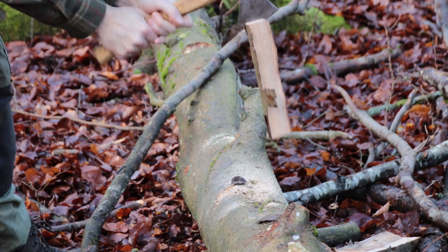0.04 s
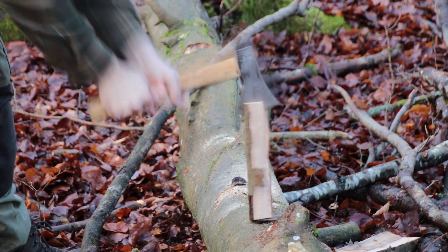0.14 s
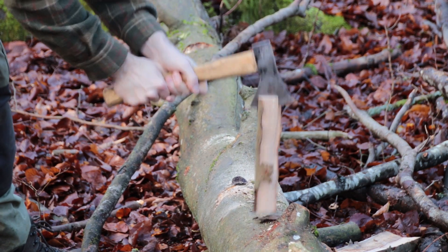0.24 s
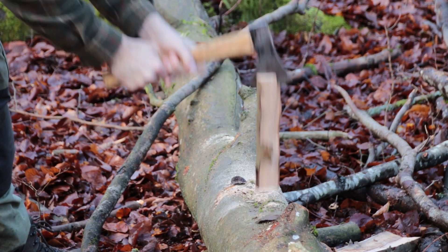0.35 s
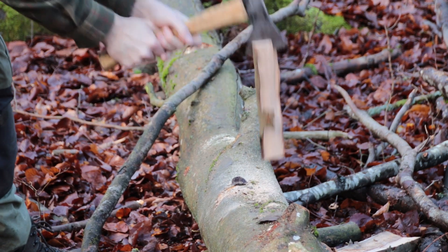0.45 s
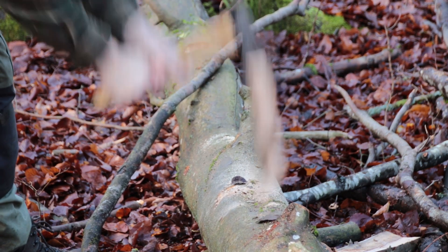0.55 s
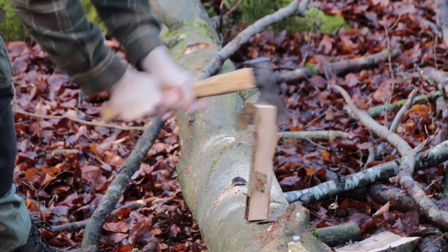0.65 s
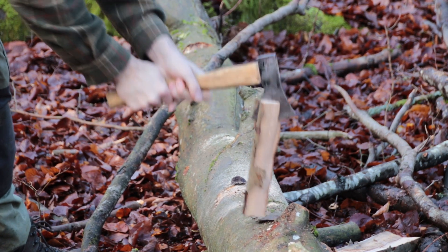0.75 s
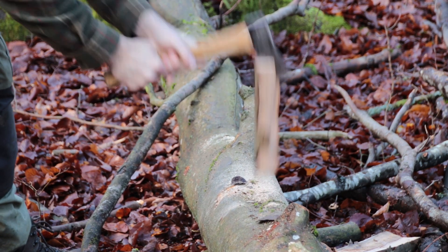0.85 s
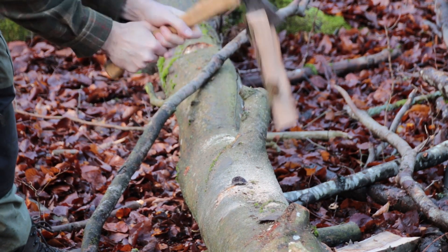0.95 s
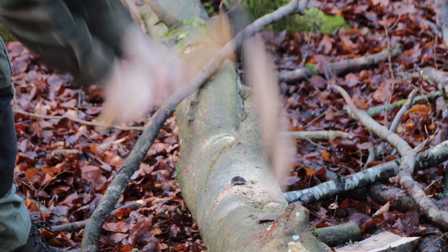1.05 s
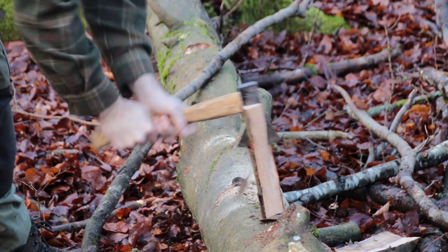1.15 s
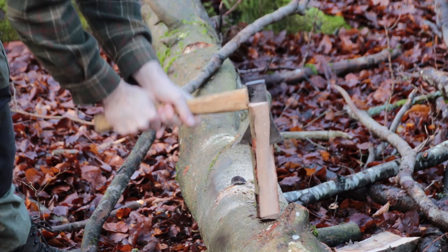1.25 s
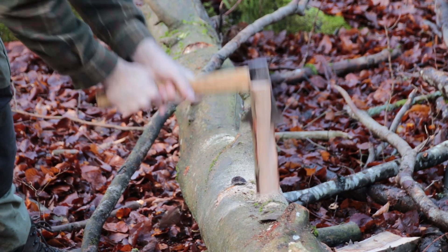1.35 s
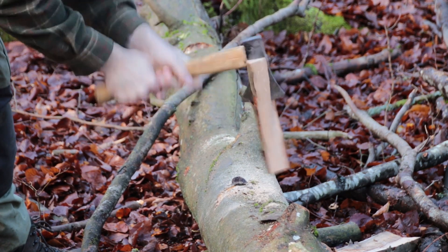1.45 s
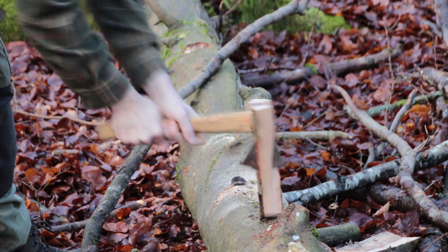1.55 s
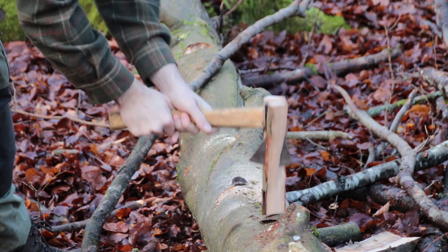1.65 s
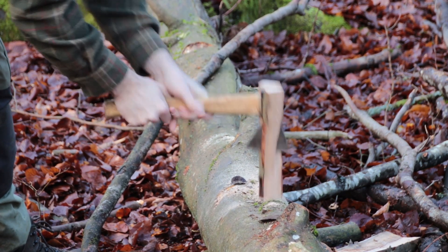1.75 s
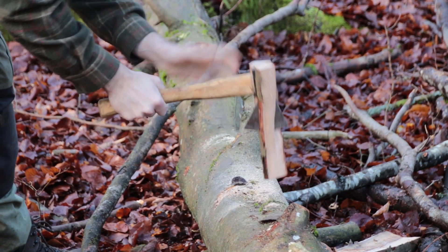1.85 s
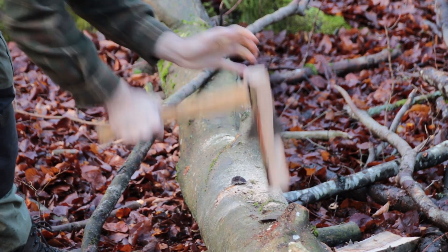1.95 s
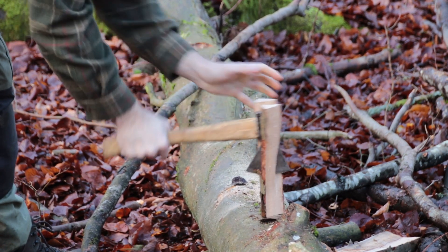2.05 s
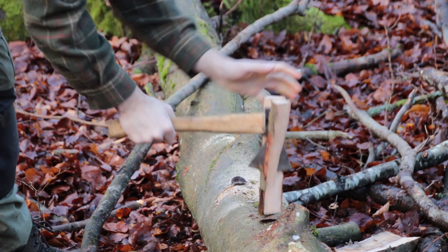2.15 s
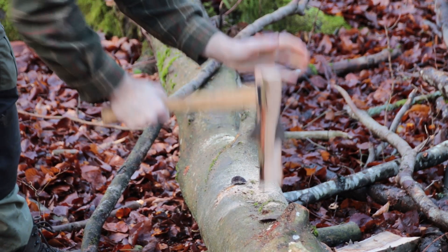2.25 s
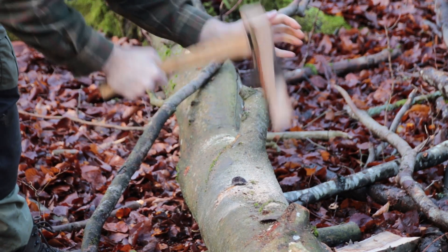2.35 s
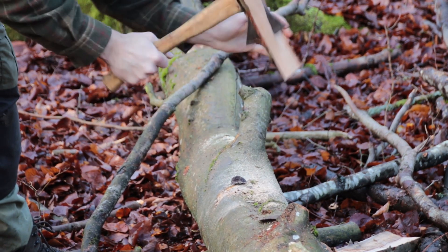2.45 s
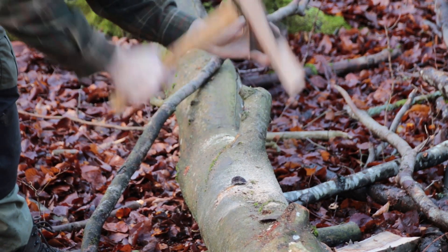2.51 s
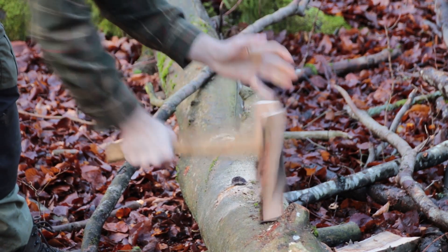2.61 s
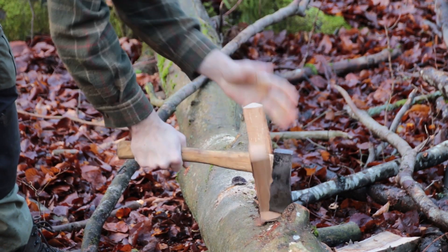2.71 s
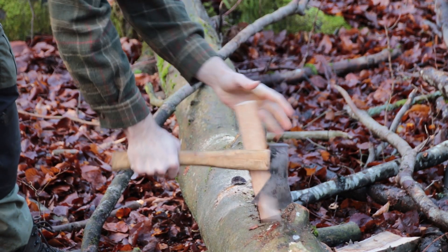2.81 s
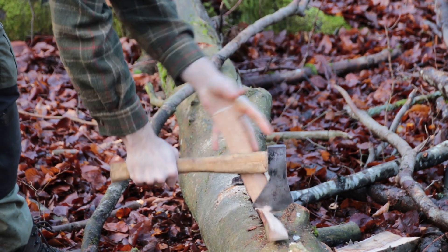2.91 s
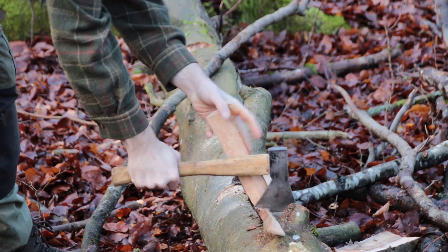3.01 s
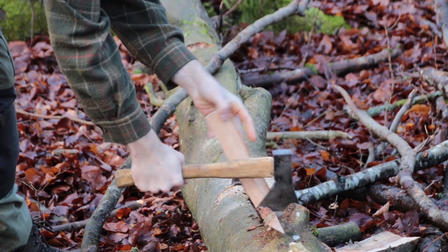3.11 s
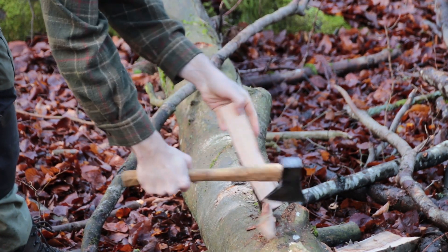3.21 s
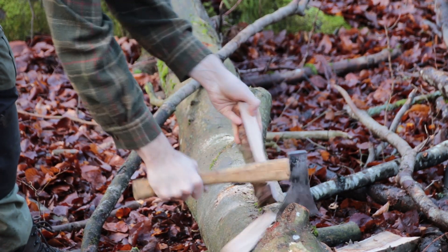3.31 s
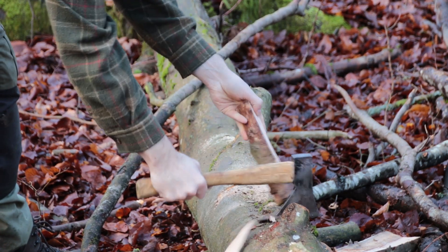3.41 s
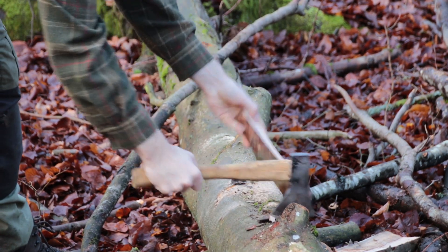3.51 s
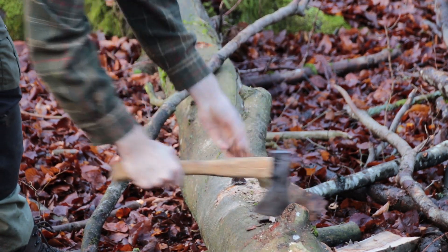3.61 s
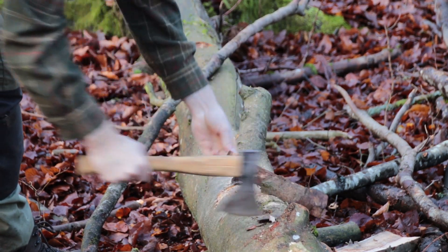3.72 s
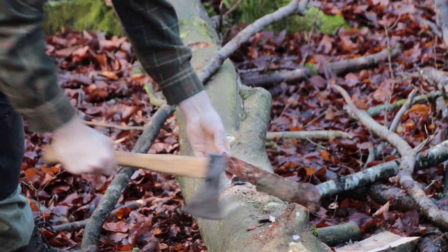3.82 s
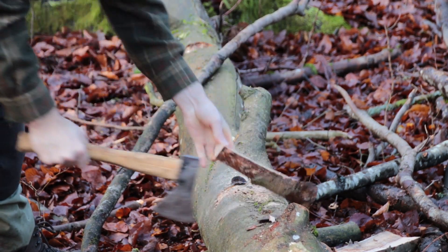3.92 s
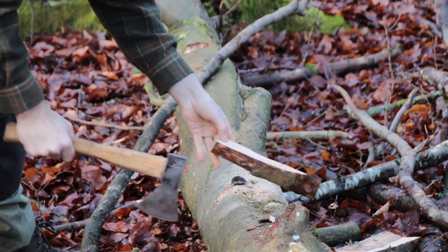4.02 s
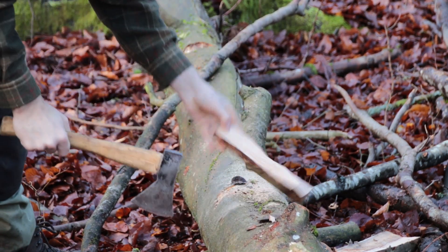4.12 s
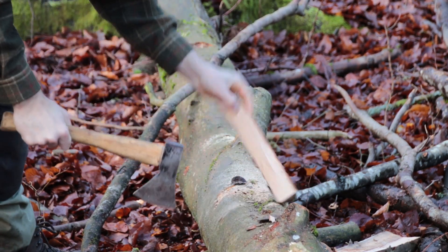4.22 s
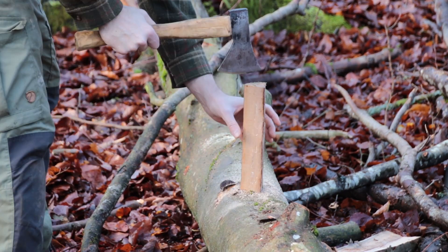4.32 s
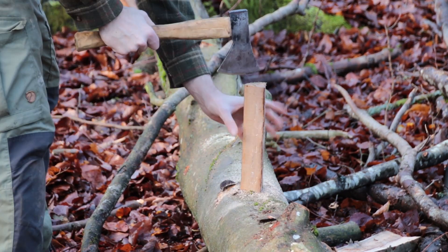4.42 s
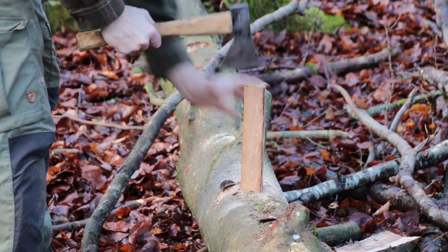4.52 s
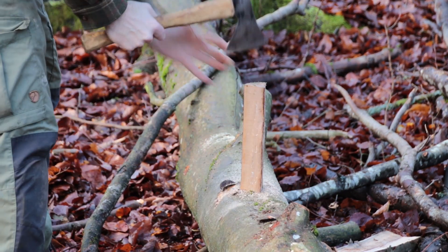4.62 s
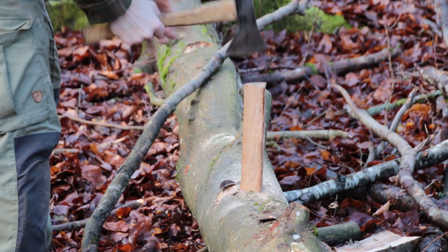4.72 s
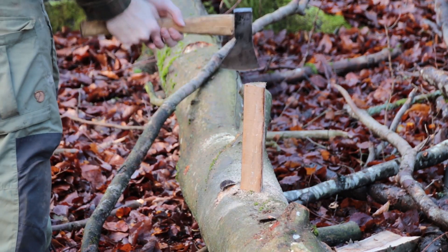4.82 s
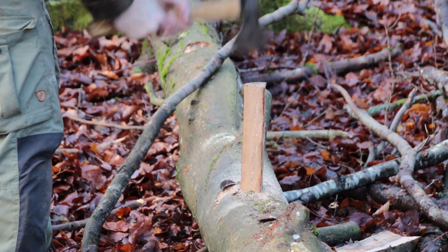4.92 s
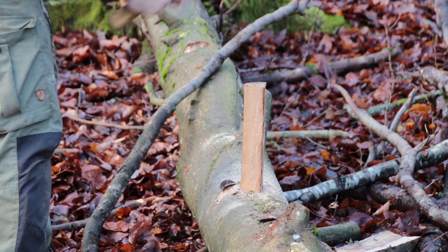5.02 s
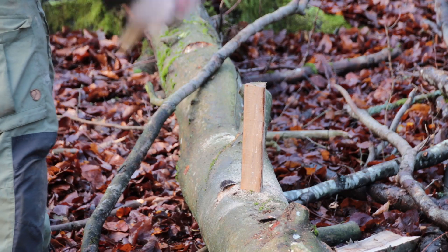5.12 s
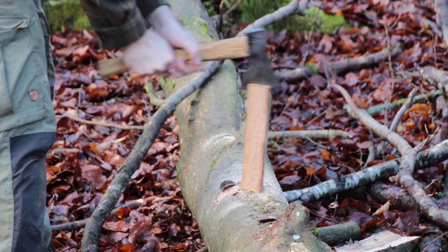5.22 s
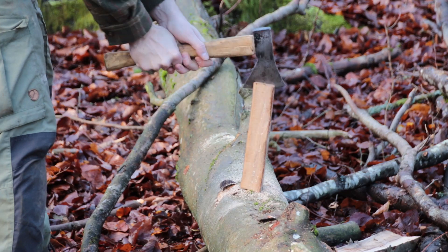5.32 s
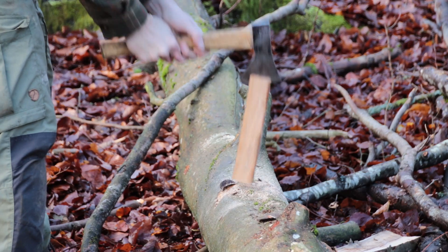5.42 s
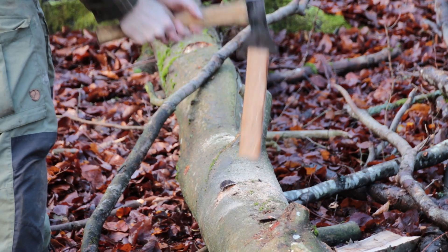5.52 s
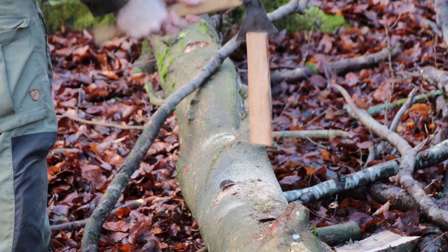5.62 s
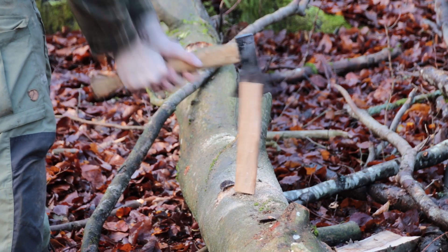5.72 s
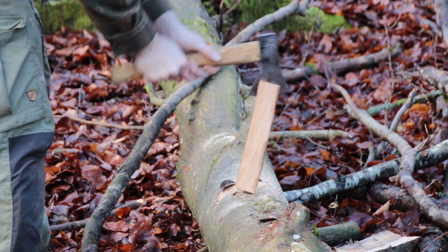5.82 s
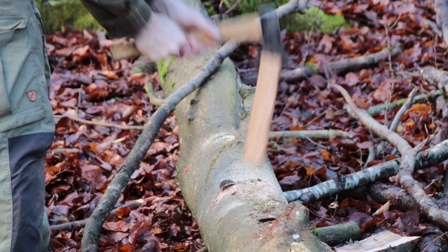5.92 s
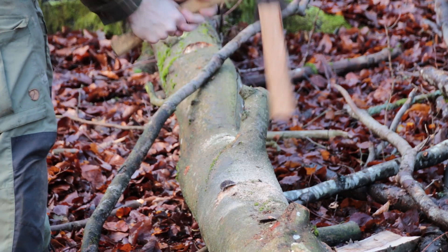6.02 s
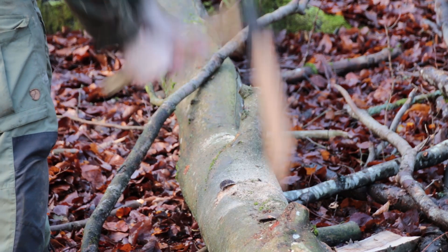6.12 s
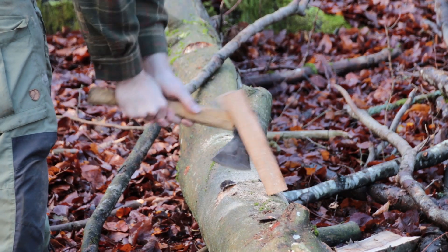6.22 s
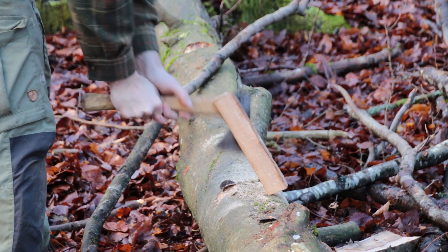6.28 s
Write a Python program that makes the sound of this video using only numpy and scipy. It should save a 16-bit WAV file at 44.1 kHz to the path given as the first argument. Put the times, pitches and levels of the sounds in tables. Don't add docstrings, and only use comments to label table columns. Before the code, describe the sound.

Close, sharp wood-splitting blows on a hollow-ringing log, fibres crackling and trees answering, with small hand and cloth noises in a quiet winter wood.

```python
import sys
import numpy as np
from scipy import signal
from scipy.fft import rfft, irfft, next_fast_len
from scipy.io import wavfile
from scipy.ndimage import uniform_filter1d, map_coordinates

SR = 44100
rng = np.random.default_rng(int(sys.argv[2]) if len(sys.argv) > 2 else 0)


def bounce(signal):
    frames = np.transpose(np.atleast_2d(signal))
    limited = np.clip(frames, -1, 1)
    pcm = np.round(limited * 32767).astype(np.int16)
    wavfile.write(sys.argv[1], SR, pcm)


def gain_from_db(level_db):
    decades = np.asarray(level_db, float) / 20
    return 10 ** decades


N = 280035

# crest_s, thud_db, trunk_ring_db, spot_along_trunk_0_1, ground_boom_db
BLOWS = [
    (0.2528, -2, -2.5, 0.4, -41.5),
    (.686, -3, -2, .456, -44),
    (1.184, 3, 3, 0.4, -57),
    (1.6284, -3.5, -4.5, 0.1, -63),
    (2.1016, -8, -9, 0.3, -51),
    (2.723, 1, 0, 0.7, -52),
    (2.9731, -30.5, -44, 0.7, -75.5),
    (5.287, 2, 2.5, .328, -38.5),
    (5.8068, -8, -9, 0.1, -52),
    (6.2546, 0, -0.5, .332, -48),
]
# tone_hz, width_hz, lift_db
BILLET_MODES = [
    [(2736, 400, 6), (4250, 540, 7), (7900, 760, 3.5)],
    [(2780, 510, 8.5), (4113, 400, 11), (7570, 660, -2.5)],
    [(2650, 190, 7), (3900, 170, 12.5), (8100, 1300, 1.5)],
    [(2900, 300, 13.5), (5000, 1600, 6.5), (8200, 1300, 7.5)],
    [(1700, 450, 9), (2606, 410, 2.5), (4500, 1100, 7.5)],
    [(1600, 250, 3), (3970, 340, 6), (4506, 870, 5.5)],
    [(1000, 190, 9.5), (1850, 760, 20), (3100, 190, 7), (4500, 600, 18)],
    [(2950, 610, 6.5), (3900, 330, 8), (7500, 590, 0.5)],
    [(3450, 1200, 12.5), (5030, 560, 9.5), (6750, 1200, 12)],
    [(2830, 330, 6.5), (3400, 300, 6), (8330, 980, 4)],
]
# tone_hz, width_hz
TRUNK_MODES = [(190, 93), (267, 23.8), (351, 14), (423, 36), (456, 51), (592, 14), (700, 22), (830, 33),
               (965, 43), (1135, 33), (1330, 210)]


def unit(x):
    return x / np.sqrt(np.mean(x ** 2) + 1e-20)


def along(points, hz):
    f, v = np.transpose(points)
    return np.interp(np.log(hz + 1), np.log(f + 1), v)


def coloured(x, spectrum, lifts=()):
    m = next_fast_len(x.shape[-1] + 2048)
    hz = np.fft.rfftfreq(m, 1 / SR)
    db = along(spectrum, hz)
    for tone_hz, width_hz, lift_db in lifts:
        db = db + lift_db / (1 + (2 * (hz - tone_hz) / width_hz) ** 2)
    cepstrum = irfft(db * np.log(10) / 20, m)
    cepstrum[1:m // 2] *= 2
    cepstrum[m // 2 + 1:] = 0
    response = np.exp(rfft(cepstrum))
    return irfft(rfft(x, m) * response, m)[..., :x.shape[-1]]


def add(track, s, sound):
    part = track[round(s * SR):][:len(sound)]
    part += sound[:len(part)]


def dying(t, t60, attack):
    return gain_from_db(-60 * t / t60) * (1 - np.exp(-t / attack))


def sine(hz, t):
    return np.sin(2 * np.pi * hz * t)


def thuds():
    # crest_s, peak_db
    rebounds = [(0.2555, -11.5), (.257, -9.5), (0.2664, -16), (0.2782, -14), (0.7, -10), (.2893, -24),
                (5.3335, -24), (6.3008, -24), (1.6665, -25), (1.683, -27), (5.206, -37), (0.7122, -12),
                (1.2064, -11.5), (1.211, -15), (1.188, -2.5), (1.631, -21.5), (1.6342, -9), (2.1052, -11.5),
                (2.124, -19), (2.734, -8), (5.302, -10.5), (5.3133, -16), (5.2892, -9.5), (5.8106, -6),
                (5.8136, -15), (5.8241, -10.5), (6.257, -6), (6.2693, -8), (6.274, -15)]
    out, u = np.zeros(N), np.arange(-260, 260) / SR
    swing_hz = np.where(u < 0, 690, 430)
    spread_s = np.where(u < 0, 0.0009, 0.0013)
    chirp = 45000 * np.minimum(u, 0) ** 2
    swing = np.cos(2 * np.pi * (swing_hz * u - chirp)) * np.exp(-(u / spread_s) ** 2)
    for s, db in [blow[:2] for blow in BLOWS] + rebounds:
        add(out, s + u[0], gain_from_db(db) * swing)
    return signal.sosfilt(signal.butter(2, 120, "high", fs=SR, output="sos"), out)


def fractures():
    # start_s, peak_db, billet_ring_hz, splinter_brightness_db
    cracks = [(0.255, -8.5, 4360, -9), (0.258, 1, 2780, -9), (0.2617, -9.5, 4250, -2),
              (0.688, -8, 4370, -7), (0.6901, 1, 2810, -15), (0.6906, -7.5, 4200, -3.5),
              (.695, -11.5, 3900, -7), (1.1843, -7.5, 3995, -9), (1.2017, -6, 4120, -12),
              (1.1888, 11, 2400, -11.5), (1.1912, -5, 2725, -9), (1.1955, 0.5, 2785, -8.5),
              (1.1984, 0.5, 2570, -8), (1.2041, -12, 3286, -10.5), (1.6318, -6.5, 2872, -15.5),
              (1.6369, -12, 2812, -6.5), (1.643, -4.5, 2922, -7.5), (1.6464, -1.5, 2881, -9.5),
              (1.6492, -1.5, 2900, -6), (2.1039, -15, 5000, -10), (2.1053, -14.5, 1957, -11.5),
              (2.1139, -23, 3015, -12.5), (2.725, -12, 3900, -8), (2.7264, -5, 4500, -6),
              (2.7263, -2.5, 1600, -9.5), (2.73, -4, 1590, -3.5), (2.7366, -10.5, 3610, -4.5),
              (2.7412, -8, 3960, 0), (2.7465, -12, 3650, -4.5), (2.9772, -22, 1850, -30.5),
              (2.9805, -24.5, 1820, -29.5), (5.29, 0, 3100, -5.5), (5.2922, -6.5, 4015, -7.5),
              (5.293, 8, 2859, -7.5), (5.294, 3.5, 2945, -9.5), (5.301, -17, 3343, -9.5),
              (5.8087, -17, 2970, -7.5), (5.8142, 1.5, 2830, -13), (5.8154, -3.5, 3810, -13.5),
              (5.8155, -8.5, 5000, -16), (5.826, -17.5, 3100, -13.5), (5.8203, -16, 3180, -6),
              (6.2574, 0.5, 1884, -12), (6.2592, 2.5, 2728, -12), (6.2616, -4, 3560, -8.5),
              (6.2719, -9, 3450, -15.5), (6.278, -9, 3370, -18), (6.283, -17, 3354, -27)]
    loudest = []
    for s, *_ in BLOWS:
        of_blow = [c for c in cracks if 0 < c[0] - s < 0.05]
        loudest.append(max(of_blow, key=lambda c: c[1]))
    return cracks, loudest


def cracking():
    # tone_hz, density_db
    splinter_spectrum = [(500, -24.5), (950, -3), (1450, -4), (2000, -7), (4000, -4), (6000, -17.5),
                         (8000, -11.5), (10000, -24), (13000, -16), (15800, -26.5)]
    out, t = np.zeros(N), np.arange(SR // 12) / SR
    dull, bright = np.zeros((2, N))
    for s, db, hz, bright_db in fractures()[0]:
        body = gain_from_db(db) * dying(t, 0.012, 0.00019)
        spit = gain_from_db(db) * dying(t, 0.0081, 0.00019)
        sizzle = gain_from_db(db - 19) * dying(t, 0.045, 0.0013)
        spit = spit + sizzle
        drift = np.cumsum(rng.standard_normal(len(t))) * 0.06
        add(out, s, 0.78 * body * np.sin(2 * np.pi * hz * t + drift))
        add(dull, s, gain_from_db(4.5) * spit * rng.standard_normal(len(t)))
        add(bright, s, gain_from_db(bright_db + 17.5) * spit * rng.standard_normal(len(t)))
    for (s, *_), modes in zip(BLOWS, BILLET_MODES):
        start_s = s - 0.002
        span = slice(round(start_s * SR), round(start_s * SR) + SR // 8)
        mixed = coloured(dull[span], [(3500, 2.5), (6000, -35.0)])
        mixed = mixed + coloured(bright[span], [(3000, -31.5), (5000, 1.0)])
        add(out, start_s, coloured(mixed, splinter_spectrum, modes))
    return out


def billet_thunk():
    # start_s, peak_db, tone_hz, t60_s
    billet_rings = [(.2545, -14.5, 420, .09), (0.2542, -22.5, 958, .05), (.688, -12, 416, .1),
                    (0.69, -21.5, 962, .05), (.689, -13, 1250, 0.039), (0.687, -13.5, 1600, 0.024),
                    (.254, -13.5, 201.1, 0.055), (0.687, -14, 200, .06), (2.104, -22, 205, 0.065),
                    (2.7242, -11, 247.3, .07), (6.257, -14.5, 200.2, .06), (1.186, -21, 761.6, .06),
                    (2.725, -13, 1090, 0.063), (.255, -18.5, 1400, 0.022), (1.634, -10, 1150, 0.029),
                    (1.63, -21, 711, .09), (2.103, -19, 1000, 0.029), (2.103, -35, 572, 0.094),
                    (2.725, -12.5, 817, 0.057), (2.9762, -21, 1740, .04), (5.289, -10, 457, 0.089),
                    (5.289, -13.5, 597, .06), (5.8101, -17.5, 272, 0.14), (5.81, -14.5, 780, .06),
                    (6.256, -12.5, 453, .08), (6.256, -18, 548, 0.046),
                    (6.2775, 2, 3350, .016), (6.282, -10, 3450, .025), (6.2575, -6, 1600, .015),
             (6.2645, -12, 1800, .015), (5.8165, -8, 5050, .022), (5.8095, -16, 5200, .012),
             (5.833, -22, 5100, .015), (5.864, -26, 3000, .02), (5.865, -28, 5000, .012),
             (1.661, -22, 5150, .015), (1.633, -14, 1900, .012), (1.633, -17, 4100, .012),
             (5.8102, -13, 400, .05), (2.9765, -23, 2120, .03), (2.7315, -12, 3550, .02),
             (2.7265, -12, 2650, .012), (5.816, -18, 950, .03), (1.6325, -9, 600, .04),
             (1.654, -22, 2950, .04), (3.44, -40, 450, .08), (2.982, -35, 1760, .12),
             (2.977, -25, 1020, .05), (3.055, -41, 1750, .025), (5.2945, -2, 2750, .014),
             (5.304, -20, 2800, .03), (5.343, -27, 3000, .03), (1.188, -8, 1750, .015),
             (2.1045, -16, 1900, .012), (.6895, -6, 880, .02), (5.204, -36, 290, .09),
             (5.204, -42, 520, .05)]
    out, t = np.zeros(N), np.arange(SR // 2) / SR
    for s, db, hz, t60_s in billet_rings:
        add(out, s, gain_from_db(db) * dying(t, t60_s, 0.001) * sine(hz, t))
    return out


def trunk_ring():
    woken_db = [-13.5, 0, -6.5, -14, -6, -4.5, 0, 0.5, 1.5, -6.5, -11.5]
    out, t = np.zeros(N), np.arange(SR // 2) / SR
    hz, width_hz = np.transpose(TRUNK_MODES)[:, :, None]
    half_waves = 7 + np.arange(len(hz))[:, None]
    decay = gain_from_db(np.array(woken_db)[:, None] - 34.3 * width_hz * t)
    builds = 1 - np.exp(-(t / 0.002) ** 2)
    for s, _, ring_db, spot, _ in BLOWS:
        wander = np.cumsum(rng.standard_normal((len(hz), len(t))), 1) * 0.03
        shape = 0.15 + np.abs(np.sin(np.pi * half_waves * spot))
        ring = shape * decay * np.cos(2 * np.pi * hz * t + wander)
        add(out, s, gain_from_db(ring_db - 8.5) * ring.sum(0) * builds)
    return out


def wood_set_down():
    # start_s, peak_db, t60_s, hardness_hz
    knocks = [
        (1.52, -37.5, 0.051, 1532),
        (3.443, -28.5, 0.024, 1480),
        (3.458, -37, 0.07, 1300),
        (4.265, -32.5, 0.069, 1570),
        (5.202, -49, 0.089, 700),
        (2.9747, -31, .1, 1900),
    ]
    out, t = np.zeros(N), np.arange(SR // 2) / SR
    hz = np.transpose(TRUNK_MODES)[0][:, None]
    for s, db, t60_s, hard_hz in knocks:
        tilt_db = 6.0 * np.log2(hz / 500) * (hard_hz / 1500 - 1.5)
        level = gain_from_db(4.8 * rng.standard_normal(hz.shape) + tilt_db)
        detuned_hz = hz * (1 + 0.06 * rng.standard_normal(hz.shape))
        ring = level * np.sin(2 * np.pi * detuned_hz * t + rng.uniform(0, 2.4, hz.shape))
        add(out, s, gain_from_db(db - 11.5) * ring.sum(0) * dying(t, t60_s, 0.0011))
        bark = [(150, -12), (400, 0), (hard_hz, -4), (4 * hard_hz, -22)]
        puff = unit(coloured(rng.standard_normal(len(t)), bark))
        add(out, s, gain_from_db(db - 11.5) * puff * dying(t, t60_s, 0.00089))
    return out


def ground():
    out, t = np.zeros(N), np.arange(SR // 2) / SR
    for s, *_, boom_db in BLOWS:
        add(out, s + 0.0082, gain_from_db(boom_db) * sine(48, t) * dying(t, 0.52, 0.027))
    return out


def ticks_and_chips():
    # start_s, peak_db, tone_hz
    ticks = [(1.2508, -33, 12430), (1.2996, -38.5, 10870), (1.3032, -34.5, 8330), (1.524, -39, 7830),
             (1.559, -41, 7870), (3.3841, -37, 5200), (3.4422, -39.5, 5910), (3.446, -39, 7890),
             (3.4997, -40, 4210), (1.4157, -33, 3790), (1.4473, -31.5, 3020), (1.4686, -31, 2865),
             (1.4944, -36, 4500), (1.5021, -35.5, 3600), (1.604, -36.5, 2950), (1.8373, -42.5, 2950),
             (1.931, -40.5, 2470), (1.9419, -35.5, 8200), (1.9634, -30.5, 1460), (1.972, -41.5, 7660),
             (2.9152, -43, 7770), (3.0971, -38.5, 4600), (3.3813, -33.5, 3665), (3.3905, -31, 3453),
             (3.412, -31.5, 1293), (3.478, -46.5, 1700), (3.4637, -30.5, 1850), (3.497, -40.5, 1700),
             (3.6152, -32, 3440), (3.6542, -39, 8040), (3.69, -34.5, 3900), (3.864, -41, 7750),
             (4.0303, -39, 3390), (4.0813, -38.5, 4840), (4.1486, -32, 5390), (4.2668, -34, 2280),
             (4.6129, -39, 2950), (4.893, -45, 4720)]
    # start_s, peak_db, tone_hz, t60_s
    chips = [(1.6604, -16, 2950, .016), (1.7014, -33, 2900, .03), (1.7053, -35, 8190, .02),
             (2.7507, -24, 7500, .034), (2.9762, -29, 4700, .022), (2.9762, -23, 1000, .04),
             (3.006, -29, 1950, .015), (3.01, -29, 1800, .015), (2.9871, -31, 2200, .018),
             (3.0027, -34, 1850, .015), (3.018, -33, 1792, .02), (5.8785, -34, 3000, .025),
             (2.9765, -24, 3150, .025), (2.995, -31, 1880, .015), (6.294, -19, 3400, .025),
             (2.1095, -26, 3800, .02), (5.832, -25, 6970, .025), (5.8551, -28, 4990, .015),
             (5.8647, -26, 6730, .02)]
    out, t = np.zeros(N), np.arange(SR // 4) / SR
    contacts = [(*tick, 0.011, 0.56) for tick in ticks]
    contacts += [(*chip, 0.45) for chip in chips]
    for s, db, hz, t60_s, noisy in contacts:
        around = [(hz / 3, -20), (hz, 0), (hz * 1.5, -9), (hz * 5, -25)]
        noise = unit(coloured(rng.standard_normal(len(t)), around))
        mixed = (1 - noisy) * sine(hz, t) + noisy * noise
        add(out, s, gain_from_db(db) * dying(t, t60_s, 0.0003) * mixed)
    return out


def steel():
    # start_s, peak_db, tone_hz, t60_s
    touches = [(1.2043, -41, 7200, 0.13), (1.206, -22, 2760, .05), (1.651, -39, 2900, .14),
               (1.654, -36, 3030, .13), (3.389, -44.5, 7340, 0.097), (3.39, -26, 2430, 0.012),
               (3.4098, -34, 2200, 0.027), (3.4125, -37, 2220, 0.018), (3.41, -41.5, 4250, 0.033),
               (3.449, -54, 7300, 0.22), (3.467, -49.5, 3100, 0.14), (4.27, -50, 1800, .1),
               (3.3905, -31, 3600, 0.013)]
    out, t = np.zeros(N), np.arange(SR // 4) / SR
    for s, db, hz, t60_s in touches:
        add(out, s, gain_from_db(db) * dying(t, t60_s, 0.001) * sine(hz, t))
    return out


def rustle():
    # crest_s, rise_s, fall_s, crest_db, brightness_db
    strokes = [(1.239, .04, 0.16, -36, -13), (3.03, .04, .1, -48, -12), (6.336, .05, .0065, -38, -3),
               (2.775, .04, .06, -36, -20), (1.69, 0.052, .12, -43.5, -7.5), (1.46, 0.27, 0.41, -46.5, -13),
               (1.937, 0.012, 0.054, -46.5, -7), (2.925, 0.045, 0.067, -48, -10),
               (3.11, 0.1, 0.08, -52, -1), (3.386, 0.023, 0.037, -43.5, -4.5),
               (3.462, 0.017, .06, -52, -12.5), (3.628, 0.016, 0.033, -33, -5.5),
               (3.68, 0.037, 0.26, -55, 1.5), (4.03, .1, 0.13, -58, 2), (4.143, .035, 0.043, -43.5, 0.1),
               (4.548, 0.036, 0.079, -54.5, 5), (5.185, 0.043, 0.069, -52, -1.2),
               (5.334, .04, 0.063, -35.5, 2.5), (5.866, 0.033, .04, -45.5, 9.5)]
    # tone_hz, density_db
    cloth_spectrum = [(150, -28.5), (350, 1.5), (1000, 1), (2200, 0.5), (4500, -5), (7000, -15),
                      (11000, -21), (15000, -26)]
    out = np.zeros(N)
    clumps = gain_from_db(3 * unit(uniform_filter1d(rng.standard_normal(N), 130)))
    grains = clumps * rng.standard_normal((2, N)) * gain_from_db(1.6 * rng.exponential(size=(2, N)))
    low = coloured(grains[0], cloth_spectrum + [(16000, -55)])
    high = coloured(grains[1], [(1500, -40.0), (3500, 1.5), (7500, 4), (13000, -10)])
    low, high = low / low.std(), high / high.std()
    for s, rise_s, fall_s, db, bright_db in strokes:
        now = np.arange(round((s - rise_s) * SR), round((s + 2 * fall_s) * SR))
        away = np.maximum((s - now / SR) / rise_s, (now / SR - s) / fall_s)
        level = gain_from_db(db - 4.0 - 19 * away)
        out[now] += level * (low[now] + gain_from_db(bright_db) * high[now])
    return out


def scatter(decays, spectrum, delay_s):
    hz, t, z = signal.stft(rng.standard_normal(SR), SR, nperseg=256)
    db = along(spectrum, hz)[:, None] - 60 * t / along(decays, hz)[:, None]
    tail = signal.istft(z * gain_from_db(db), SR, nperseg=256)[1]
    builds = 1 - np.exp(-(np.arange(len(tail)) / SR / delay_s) ** 2)
    return (tail * builds)[:SR]


def forest():
    # tone_hz, t60_s
    near_decay = [(150, 0.14), (600, 0.46), (2000, 0.34), (6000, 0.18), (10000, 0.14), (14000, 0.1)]
    # tone_hz, t60_s
    far_decay = [(150, 0.22), (600, 0.51), (2000, 3.4), (6000, 0.95), (14000, 2)]
    # tone_hz, density_db
    far_spectrum = [(150, -1.5), (600, 4), (1200, -12), (2500, -17), (6000, -7), (9000, -13.5),
                    (14000, -23.5)]
    # tone_hz, density_db
    wash_spectrum = [(88, -42), (150, -9.5), (314, 5.5), (708, -12), (912, -7.5), (2060, -15.5),
                     (3040, -10), (3410, -16), (8170, -10), (10500, -20), (13500, -18.5), (15500, -28.5)]
    # wash_db, tilt_db_per_octave, billet_colour_0_1, far_trees_db
    debris = [
        (-35, 1.74, 0, -26.5),
        (-36.5, 0, .25, -27.5),
        (-30, 2, 0.1, -28),
        (-33.5, 3, .8, -27),
        (-42, -3, .2, -37),
        (-32, 0.5, 0.1, -24),
        (-53.5, -1.4, 0.95, -40.5),
        (-33, 2, 0.7, -21),
        (-35.5, 1.5, 1, -20.5),
        (-29.5, 2.5, 0.3, -26),
    ]
    out, t = np.zeros(N), np.arange(SR) / SR
    for (s, *_), modes, stirred, (loudest_s, *_) in zip(BLOWS, BILLET_MODES, debris, fractures()[1]):
        wash_db, tilt_db, share, far_db = stirred
        thicket = 1 + 0.8 * np.exp(-((t + s - loudest_s - 0.05) / 0.014) ** 2)
        tilt = [(500, 0.00069), (8000, 4 * tilt_db)]
        near_modes = [(hz, max(width_hz, 450), share * db) for hz, width_hz, db in modes]
        wash = coloured(scatter(near_decay, wash_spectrum, 0.0088) * thicket, tilt, near_modes)
        add(out, s + 0.002, gain_from_db(wash_db) * wash / np.std(wash[:SR // 20]))

        colour = 0.3 + 1.2 * share
        far_modes = [(hz, max(width_hz, 600), colour * db) for hz, width_hz, db in modes]
        far = coloured(scatter(far_decay, far_spectrum, 0.0087), [(100, 0)], far_modes)
        clumps_db = 1.2 * map_coordinates(rng.standard_normal(30), [25 * t])
        add(out, loudest_s, gain_from_db(far_db - 26.5 + clumps_db) * far / np.std(far[:SR // 10]))
    return out


def air():
    # tone_hz, density_db
    murmur_spectrum = [(12, -46.5), (20, -6.5), (167, -6), (377, -8), (424, -9.5), (622, -9.5), (684, -8.5),
                       (911, -9.5), (1300, -15.5), (1470, -16.5), (6000, -25), (7800, -68), (13200, -120)]
    z = signal.stft(rng.standard_normal(N), nperseg=512)[2]
    patches = uniform_filter1d(uniform_filter1d(rng.standard_normal(z.shape), 5, 0), 12, 1)
    noise = signal.istft(z * gain_from_db(1.9 * unit(patches)), nperseg=512)[1][:N]
    power = np.full(N, gain_from_db(2 * -65.5))
    for s, db, *_ in BLOWS + [(-0.19, 1.5)]:
        since_s = np.maximum(np.arange(N) / SR - s, 0)
        power += (gain_from_db(db - 60) * dying(since_s, 4, 0.11)) ** 2
    return gain_from_db(6.5) * np.sqrt(power) * unit(coloured(noise, murmur_spectrum + [(9000, -61.5)]))


def scene():
    bass_cut = signal.butter(4, 165, "high", fs=SR, output="sos")
    chop = signal.sosfilt(bass_cut, cracking() + billet_thunk() + trunk_ring() + wood_set_down())
    handling = ticks_and_chips() + steel() + rustle()
    return np.tile(thuds() + chop + ground() + handling + forest() + air(), (2, 1))


def low_pass(x):
    return signal.sosfilt(signal.butter(12, 15980, fs=SR, output="sos"), x)


def record(dry):
    # tone_hz, density_db
    hiss_spectrum = [(12, -42), (20, -7), (76, -3), (240, -5), (540, -8.5), (675, -8), (1050, -9.5),
                     (3710, -8.5), (13800, -9.5), (15800, -12)]
    hiss = gain_from_db(-55.5) * unit(coloured(rng.standard_normal((2, N)), hiss_spectrum))
    mix = np.clip(dry + hiss, -1, 1)
    return low_pass(mix)


dry = scene()
out = record(dry)
bounce(out)
```